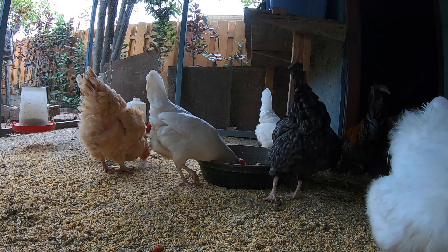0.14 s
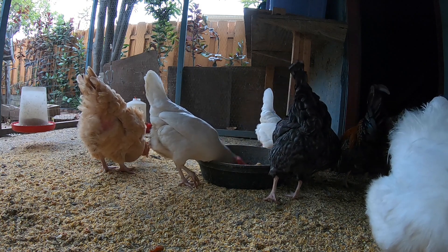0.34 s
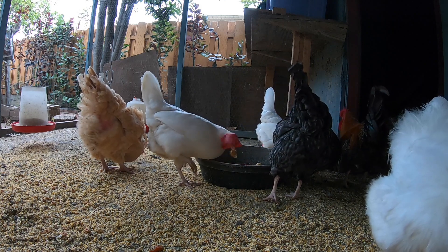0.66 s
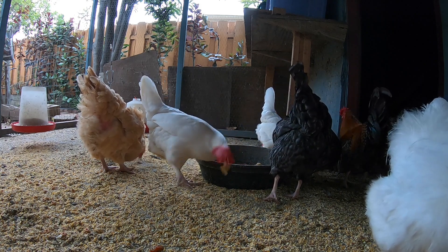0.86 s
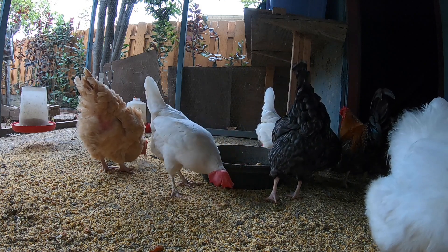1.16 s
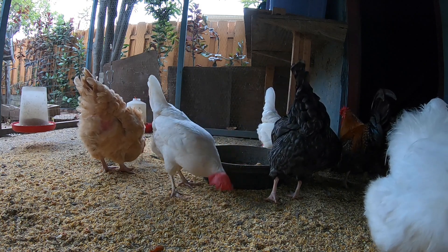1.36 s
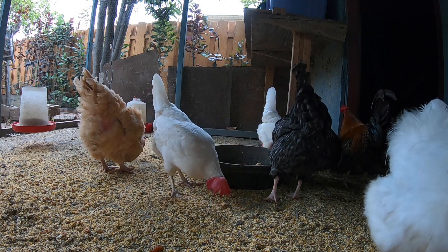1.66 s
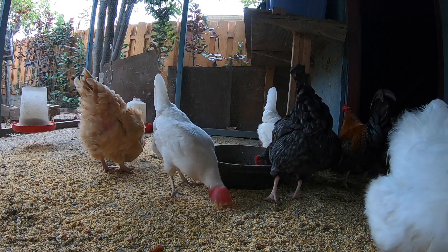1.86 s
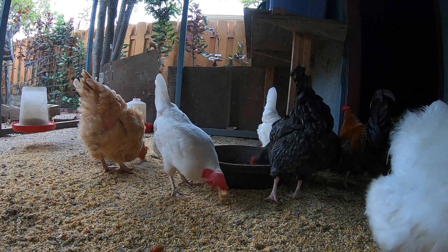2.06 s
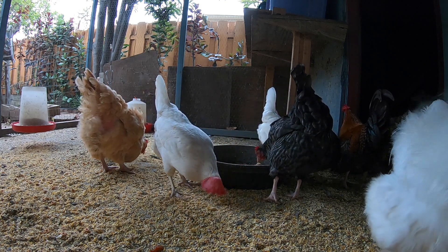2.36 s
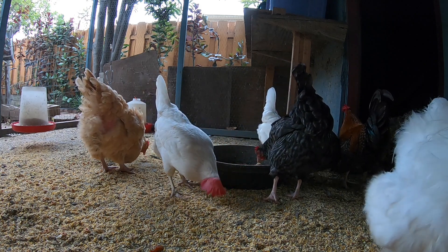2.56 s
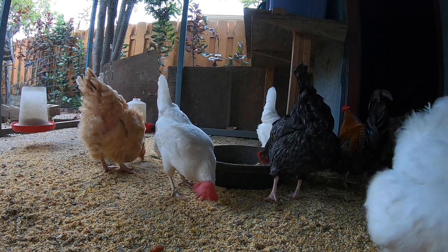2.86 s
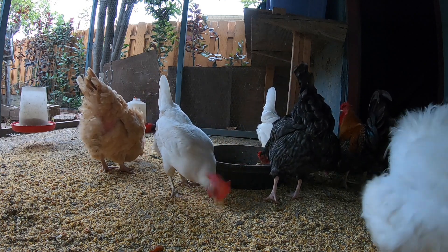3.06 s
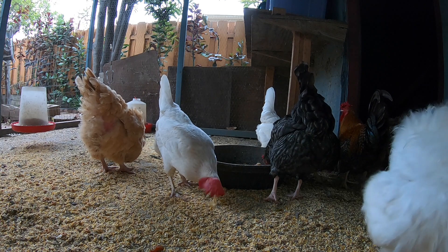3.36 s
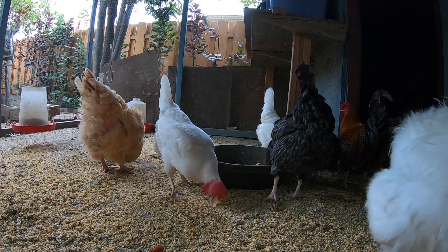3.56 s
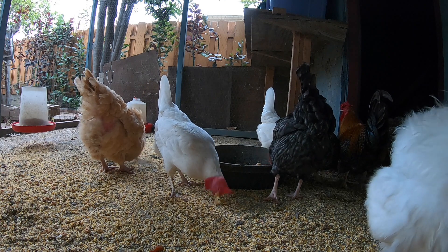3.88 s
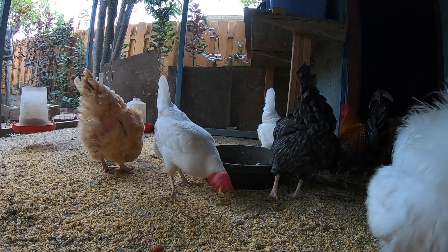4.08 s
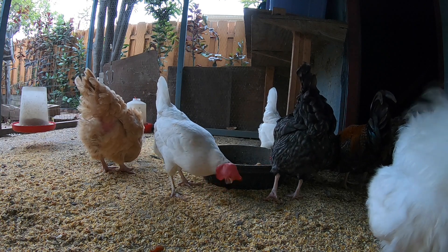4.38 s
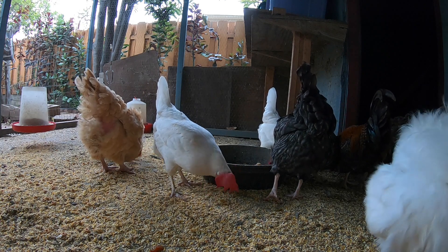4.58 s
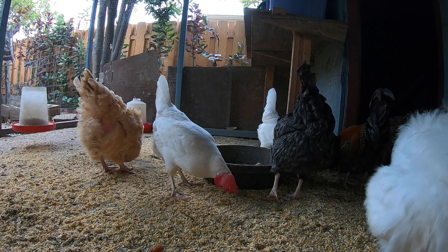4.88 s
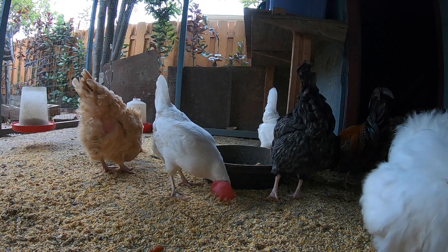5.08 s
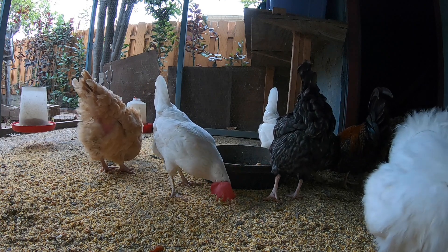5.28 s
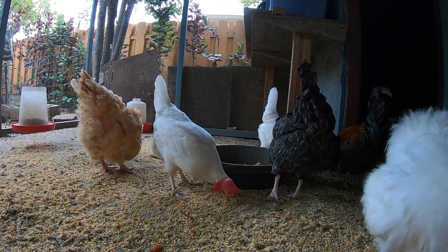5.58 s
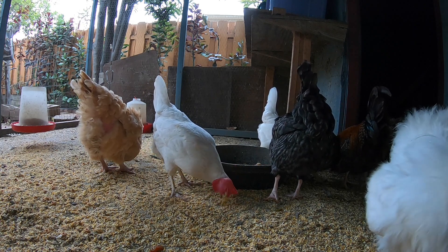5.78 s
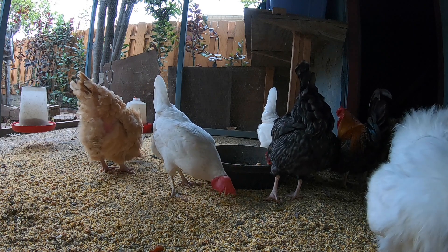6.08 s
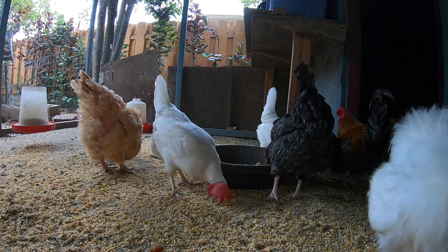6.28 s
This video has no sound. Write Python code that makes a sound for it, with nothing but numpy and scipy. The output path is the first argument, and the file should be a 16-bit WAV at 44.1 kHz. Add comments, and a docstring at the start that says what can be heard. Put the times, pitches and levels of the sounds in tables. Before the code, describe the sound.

In a backyard chicken run, a second hen briefly warbles softly before a nearby hen starts a loud, rasping growl. Eight shorter calls follow, increasingly shrill, starting hoarse and breaking into clear, nasal tones. Small dry beak ticks fall sparsely between and around calls, and later feathers stir low, soft puffs of air. A close stereo microphone places the hens somewhat left, with brief echoes from coop and fence over faint motor hum and still air.

```python
"""In a backyard run a second hen warbles softly, as falling notes with a few strong harmonics.
Then a hen cackles: one long rasping growl, and eight shorter, shriller calls that start hoarse and break
into a clear tone. Her voice is a buzzing membrane, shaped by a throat that changes posture.
Beaks tick on the feed now and then, as short bursts of noise; later feathers stir the air as low gusts.
Coop and fence echo the birds; a motor's hum and the noise of still air last throughout."""
import sys
import numpy as np
from scipy import signal
from scipy.fft import rfft, irfft
from scipy.io import wavfile
from scipy.ndimage import uniform_filter1d

SR = 44100
rng = np.random.default_rng(int(sys.argv[2]) if len(sys.argv) > 2 else 0)


def pcm_store(signal):
    """Save signal as 16-bit PCM."""
    levels = np.round(np.clip(np.atleast_2d(signal), -1, 1) * 32767)
    wavfile.write(sys.argv[1], SR, levels.astype(np.int16).T)


N = 284004
T = np.arange(N) / SR  # time of every sample, s

# the cackling hen's head: [t/s, beak opening 0-1, left minus right level/dB before each pitch takes its share]
HEAD = [(.3, 0.29, -5.5), (2.5, 0.2, -6), (3.6, 0.09, -4), (4.0, 0.28, -4), (4.12, 0.9, -5),
        (4.7, 0.84, -5.5), (5.2, 1, -5), (5.65, 0.44, -5), (6.1, 0.69, -3)]
# puffs of air stirred by feathers: [middle t/s, half length/s, level at the middle/dB]
RUFFLE = [(3.206, 0.045, -58), (3.5, 0.1, -60), (3.68, 0.11, -48.5), (3.83, 0.053, -53.5),
          (4.18, 0.09, -44), (4.33, 0.054, -57.5), (4.532, 0.11, -45), (4.72, 0.077, -40.5),
          (4.88, 0.089, -41), (5.17, 0.067, -42), (5.31, 0.053, -41.5), (5.42, .05, -45.5),
          (5.66, 0.1, -45), (6.08, 0.088, -46), (6.3, 0.092, -61)]
WANDERS_PER_S = 14  # how fast the hen's pitch, neck and loudness wander


def from_db(db):
    """Turn decibels into gain."""
    return 10 ** (np.asarray(db) / 20)


def rms_one(x):
    """Scale to an rms (average strength) of 1."""
    return x / np.sqrt(np.mean(x ** 2) + 1e-20)


def in_time(rows):
    """Draw straight lines between rows that start with a time; give each column at every sample."""
    s, *columns = np.transpose(rows)
    return [np.interp(T, s, column) for column in columns]


def butter(x, hz, kind, order=2):
    """Filter with a Butterworth filter that only looks back in time."""
    return signal.sosfilt(signal.butter(order, hz, kind, fs=SR, output="sos"), x)


def drift(rate):
    """Random wander of spread 1, up to about rate changes a second."""
    settled = butter(rng.standard_normal(N + SR), rate, "low")[SR:]  # drop the filter's first second
    return rms_one(settled)


def coloured_noise(points):
    """Noise of rms 1 whose spectrum follows the points [f/Hz, level per Hz/dB] and fades outside them."""
    hz, db = np.transpose(points)
    bins = np.maximum(np.fft.rfftfreq(N, 1 / SR), 1)
    gain = from_db(np.interp(np.log(bins), np.log(hz), db))
    gain = gain / (1 + (bins / hz[-1]) ** 8) * np.minimum(bins / hz[0], 1)
    return rms_one(irfft(rfft(rng.standard_normal(N)) * gain, N))


def swells(rows):
    """Strength of soft gestures that swell and die away evenly."""
    return sum(from_db(db) * np.exp(-((T - s) / half_s) ** 2) for s, half_s, db in rows)


def panned(x, pan_db):
    """Place a sound by its left minus right level."""
    return x * from_db(np.array([[.5], [-.5]]) * pan_db)


def hen(attack_s=0.019, release_s=0.0014, flutter_db=1.0, unsteady_db=1.07):
    """The cackle in stereo: a membrane buzzes, the throat colours it, and the turning head moves it sideways."""
    # calls, each starting as a growl: [start t/s, end t/s, growl level/dB, growl swell/dB per s,
    # growl rasp (0 = clear, about 1 = harsh), rasp added at the end]
    cackle = [ (0.279, 1.228, -44.5, 11.5, 0.97, 0.045), (1.612, 2.454, -37, 4.5, 1.04, 0.31),
              (2.701, 3.175, -30, -1, 0.93, 0.21), (3.396, 3.716, -27.5, -26, .9, 0.27),
              (3.926, 4.219, -31, 14, 0.9, 0.39), (4.496, 4.957, -33.5, 23.5, 0.78, 0.28),
              (5.076, 5.254, -30, -0.5, 0.78, 0.75), (5.525, 5.866, -32, 0.5, .85, 0.37),
              (5.976, 6.182, -31.5, -5, 0.75, 0.54), ]
    # pitch of each call, creeping up in the growl, leaping at the break, arching and dropping: [t/s, f/Hz]
    contours = [
        [(.282, 259.6), (.335, 258), (.385, 283), (.42, 273.1), (.6, 286), (.7, 309.2), (.78, 295), (.9, 310.6),
         (1.07, 308.4), (1.15, 294), (1.223, 286.4)],
        [(1.614, 254.6), (1.76, 286.3), (1.94, 299.5), (2.06, 326.6), (2.12, 354.4), (2.2, 359.4),
         (2.26, 365.3), (2.33, 396.2), (2.41, 380.6), (2.453, 361)],
        [(2.701, 253.2), (2.8, 282.5), (2.908, 284.1), (2.916, 350), (2.96, 354.5), (3.01, 372), (3.09, 388),
         (3.15, 383.2), (3.174, 366)],
        [(3.393, 246.8), (3.43, 283.3), (3.468, 295.2), (3.478, 336.3), (3.51, 353.4), (3.57, 366.4),
         (3.6, 374.2), (3.675, 397.4), (3.7, 382.7), (3.714, 363)],
        [(3.927, 313.2), (3.99, 337.5), (4.04, 382.5), (4.08, 384.9), (4.1, 422.4), (4.135, 428.7),
         (4.19, 413.3), (4.217, 380)],
        [(4.499, 311.4), (4.55, 389), (4.62, 410), (4.68, 419.8), (4.72, 412.2), (4.82, 425), (4.88, 417),
         (4.935, 412.3), (4.956, 369.7)],
        [(5.078, 318.7), (5.1, 387.2), (5.14, 407.5), (5.17, 418.6), (5.2, 417.4), (5.23, 420), (5.252, 349.6)],
        [(5.527, 348), (5.57, 394.2), (5.6, 414.1), (5.67, 421.6), (5.73, 441.2), (5.81, 455.3), (5.845, 440.2),
         (5.868, 392.2)],
        [(5.978, 344), (6, 409.8), (6.02, 441), (6.07, 438.9), (6.12, 434.3), (6.15, 429.7), (6.185, 340)],
    ]
    # three high throat resonances that glide as the neck stretches and shortens:
    # [t/s, middle f/Hz, upper f/Hz, top f/Hz, boost of the upper/dB, boost of the top/dB]
    neck = [ (.4, 3250, 5500, 7060, -18, -3), (.56, 3300, 5530, 7300, 0, 1),
            (.7, 3451, 5850, 7100, -4, 10.5), (.84, 3395, 6260, 7400, -10, 9),
            (.93, 3588, 6600, 8300, 0, 8), (1.06, 3697, 6550, 8300, -1, -3),
            (1.22, 3872, 6331, 7950, 1, -2.5), (1.62, 3780, 6400, 7900, -0.5, -6),
            (1.92, 3900, 6557, 8100, 2, 3), (2.17, 3730, 6520, 7900, 5.5, 8),
            (2.3, 3580, 6283, 7800, 0, 4.5), (2.45, 3430, 6150, 7600, -3, 3), (2.7, 3666, 6150, 7540, 1, 5),
            (2.9, 3695, 6185, 7916, 0, 1.5), (3.0, 3550, 6200, 7590, 1, -3.5),
            (3.17, 3540, 6140, 7600, 0.5, 3), (3.4, 3664, 6180, 7677, 2, 1),
            (3.71, 3650, 6253, 7790, -0.5, -3.5), (3.93, 3650, 6193, 7955, 7, 12.5),
            (4.08, 3640, 6150, 7648, 0, -5), (4.12, 3700, 5860, 7100, 7.5, 3),
            (4.21, 3550, 5690, 6794, -5, -10), (4.5, 3515, 5894, 7310, 2.5, 4),
            (4.68, 3450, 5790, 7255, -1, -0.5), (4.8, 3428, 5580, 6697, 1.5, -1.5),
            (4.95, 3400, 5498, 6800, 0.5, -5), (5.08, 3137, 5404, 6590, -14, -7),
            (5.13, 3190, 5450, 6750, -2, -2), (5.17, 3556, 5650, 6830, 8, 7.5),
            (5.25, 3550, 5717, 6910, -2, -1.5), (5.53, 3620, 5740, 7300, -6, 3.5),
            (5.62, 3660, 5738, 7250, -10, -8.5), (5.75, 3730, 6010, 7506, -3.5, 2.5),
            (5.86, 3720, 6090, 7660, -3.5, -5), (5.98, 3915, 6200, 7933, -0.5, 6),
            (6.08, 3750, 6095, 7550, 0, 6), (6.18, 3480, 5800, 7450, -1.5, 0), ]
    # how much of the head's sideways level each frequency shows: [f/Hz, share]
    shadow = [(400, 0.2), (520, 0.7), (700, 2.5), (1300, 0.5), (2300, 0.87), (4500, 0.02), (8000, 0)]
    tone_wander, growl_wander, neck_wander = 0.003, .036, 0.0054  # shares of the pitch or frequency
    # the growl's low resonances rise with its pitch and shake
    ring_rest_hz, ring_limit, ring_follows, ring_shake = 286, 1.14, .55, .03
    window = dict(nperseg=512, noverlap=384)

    gate = sum(np.clip((T - start) / attack_s + 0.38, 0, 1) * np.clip((end - T) / release_s + 1, 0, 1)
               for start, end, *_ in cackle)
    calls = np.vstack([call(contour, *row) for contour, row in zip(contours, cackle)])
    pitch, rasp, growl, *levels_db = in_time(calls)
    opening, pan_db = in_time(HEAD)
    rasp = np.clip(rasp, 0, 1.2)
    growl, opening = np.clip(growl, 0, 1), np.clip(opening, 0, 1)
    pitch = pitch * (1 + (tone_wander + growl_wander * rasp ** 2) * drift(WANDERS_PER_S))

    # cut the buzz into short overlapping frames, so its spectrum can be shaped over time
    hz, s, frames = signal.stft(syrinx(pitch, rasp, opening), SR, **window)
    hz = np.maximum(hz, 1)[:, None]
    curves = (*levels_db, growl, opening, pan_db, pitch, drift(WANDERS_PER_S))
    *levels_db, growl, wide, pan, note, bob = (np.interp(s, T, curve) for curve in curves)
    *neck_hz, upper_db, top_db = (np.interp(s, T, curve) for curve in in_time(neck))
    neck_hz = np.array(neck_hz) * (1 + neck_wander * bob)
    ring = np.minimum(note / ring_rest_hz, ring_limit) ** ring_follows
    ring = ring * (1 + ring_shake * np.interp(s, T, drift(45)))

    frames = frames * throat(hz, growl, wide, neck_hz, upper_db, top_db, ring)
    frames = registers(frames * near_echo(hz, s), hz, note, levels_db)
    pan = pan * np.interp(hz, *np.transpose(shadow))
    voice = signal.istft(frames * from_db([pan / 2, -pan / 2]), SR, **window)[1][:, :N]
    return voice * gate * from_db(flutter_db * rasp * drift(82) + unsteady_db * drift(WANDERS_PER_S))


def call(contour, start, end, growl_db, swell_db, growl_rasp, end_rasp, growl_posture=0.79, end_posture=0.75):
    """One call: effort drives a growl, breaks turn it into tones, and it ends hoarse, fading if the beak is open.

    Rows: (s, pitch Hz, rasp, share of the growl's throat, fundamental dB, chest dB, mouth dB, treble dB)."""
    # breaks into a tone or a new colour, which lasts until the next break or the call's end:
    # [t/s, time the break takes/s, chest level halfway through the tone's swell/dB, rasp 0-1,
    # share of the growl's throat 0-1, fundamental re chest/dB,
    # mouth band re chest/dB, treble re chest/dB (both before their swells)]
    breaks = [ (2.132, 0.068, -40, 0.17, 0.01, -8.5, -5.5, -8),
              (2.278, 0.05, -38.5, 0.04, 0.17, -12.5, -6, -6),
              (2.914, 0.0065, -35, 0.1, 0.01, -11, -6.5, -10.5),
              (2.98, 0.024, -39, 0.07, 0.12, -10, -6, -5.5),
              (3.475, 0.0055, -37.5, 0.34, 0.6, -7, -1, -10.5), (3.505, 0.026, -38, 0.12, 0, -10, -5.5, -6),
              (4.012, 0.024, -39, 0.05, 0.36, -5.5, -4, -6.5),
              (4.099, 0.03, -35, 0.08, 0.03, -4, -1.5, -4.5),
              (4.65, 0.023, -35.5, 0.15, 0.34, -4.5, 1, -4.5),
              (4.769, 0.029, -30.5, 0.26, 0.02, -7.5, -6, -9), (4.9, 0.046, -34.5, 0.32, 0.03, 0, -1, -3.5),
              (5.097, 0.0068, -36.5, 0, 0.79, -2, 6, -8), (5.12, 0.015, -33.5, 0.01, 0.84, -2, -0.5, -10),
              (5.147, .015, -33.5, 0.1, 0, -4, -2, -6), (5.58, 0.041, -38, 0.16, 0.06, 1.5, -4, -2),
              (5.752, .025, -35.5, 0.63, 0.11, -3.5, -2, -3), (5.803, .025, -34, 0.15, 0, -1.5, -4.5, -3),
              (6.0, 0.0084, -35, 0.04, .5, -1, -4, -7), (6.035, .02, -39, .08, 0, -1, 1.5, -2),
              (6.084, 0.058, -34, 0.19, 0.27, -1, -2.5, -6), ]
    # with the mouth band at growl_ref_db, the growl's chest and treble have these levels, before the beak's effect
    growl_ref_db, growl_chest_db, growl_treble_db = -27.5, -37, -37.5
    chest_follows, treble_follows = 0.28, 2.12  # dB per dB of effort
    rasp_limit, rasp_per_db = 1.6, .045  # most rasp at growl_ref_db, and its change per dB of effort
    scoop_s, scoop_db = 0.0516, -5.5  # the growl starts a little softer
    open_chest_db, open_fundamental_db = -3, 20.5  # change with a fully open beak
    growl_fundamental_db = -15.5  # re chest, beak closed
    band_swells_db = [2, 0, -1.5]  # change of chest, mouth and treble along a tone
    sag_s, sag_db = 0.03, -10.5  # as the call runs out

    s = np.linspace(start, end, 300)
    opening = np.interp(s, *np.transpose(HEAD)[:2])
    effort = growl_db + scoop_db * np.exp(-(s - start) / scoop_s) + swell_db * (s - start)
    extra_db = effort - growl_ref_db
    chest = growl_chest_db + chest_follows * extra_db + open_chest_db * opening
    voice = np.array([
        np.minimum(growl_rasp, rasp_limit + rasp_per_db * extra_db),
        np.full_like(s, growl_posture),
        chest + growl_fundamental_db + open_fundamental_db * opening,
        chest,
        effort,
        growl_treble_db + treble_follows * extra_db])
    for at, break_s, db, rasp, posture, fundamental_db, mouth_db, treble_db in breaks:
        if start < at < end:
            done = np.clip((s - at) / (end - at), 0, 1)
            chest, mouth, treble = db + np.outer(band_swells_db, done - .5)
            tone = np.array([np.full_like(s, rasp), np.full_like(s, posture), chest + fundamental_db,
                             chest, mouth + mouth_db, treble + treble_db])
            voice = voice + (tone - voice) * np.clip((s - at) / break_s + .5, 0, 1)
    rasp, posture, *levels_db = voice
    sag = np.exp(-((end - s) / sag_s) ** 2)
    fade_db = sag_db * sag ** 2 * opening
    rasp = rasp + end_rasp * sag
    posture = posture + end_posture * end_rasp * sag
    return np.transpose([s, np.interp(s, *np.transpose(contour)), rasp, posture, *(levels_db + fade_db)])


def syrinx(pitch, rasp, opening, jitter=0.062, waver=0.00291, split=0.28, smear=.21, top_hiss=0.033,
           shimmer_db=3.0):
    """A buzzing membrane; rasp scatters the timing and strength of its cycles, makes it slap and adds rushing air."""
    # slaps come at uneven moments and die down in between: mean rate, spread of the rate, fall at rasp 1
    slaps_per_s, slap_spread, slap_fall_db = 75, .4, 6.5
    wobble = jitter * rasp ** 1.293 * drift(216.4) + waver * drift(59.0)
    phase = 2 * np.pi * np.cumsum(pitch * (1 + wobble)) / SR
    # pushed hard, the membrane repeats only every second or fourth cycle
    uneven = np.sin(phase / 2) + .6 * np.sin(phase / 4)
    phase = phase + split * opening * np.sqrt(rasp) * uneven
    # each harmonic lags differently, which spreads the pulse over its cycle
    buzz = rms_one(sum(np.cos(k * phase - smear * np.pi * k * k) for k in np.arange(1, 35)))
    puffs = rms_one(rng.standard_normal(N) * (1 + .6 * np.cos(phase)))
    air = (.06 + .75 * rasp * (1 - .35 * opening)) * puffs
    air = air + top_hiss * butter(puffs, 5500, "high", order=3)
    since_slap = np.cumsum(slaps_per_s * np.exp(slap_spread * drift(slaps_per_s))) / SR % 1
    slap_db = slap_fall_db * rasp ** 2 * (1.0 - since_slap)
    return (buzz + air) * from_db(shimmer_db * rasp * drift(180) + slap_db)


def throat(hz, growl, opening, neck_hz, upper_db, top_db, ring, boost_width_hz=900):
    """The throat glides between three postures; stretching the neck shifts its higher resonances."""
    # throat resonances when growling, before the neck shifts them: [f/Hz, width/Hz, level/dB]
    growl_modes = [(293, 270, -19.5), (609, 270, -13), (1134, 160, 6.5), (1490, 180, -14),
                   (2120, 810, -24.5), (2885, 520, -24.5), (3513, 550, -12.5), (4550, 1400, -23.5),
                   (6170, 390, -18), (7430, 1600, -31.5), (8940, 600, -42.5)]
    # throat resonances of the clear tone, the same columns: [f/Hz, width/Hz, level/dB];
    # the last row is no throat resonance but a faint narrow band of treble near 10 kHz
    clear_bands = [(373, 500, -11), (733, 58, 1.5), (1160, 300, -1), (1472, 160, 7.5), (1880, 270, 0),
                   (2203, 160, 3), (3600, 790, 4.5), (4580, 310, -7), (6100, 325, 6.5), (7550, 680, -5),
                   (10200, 220, -38)]
    # throat resonances when shrieking, the same columns: [f/Hz, width/Hz, level/dB]
    shriek_modes = [(367, 360, -10.5), (842, 63.8, -4.5), (1190, 430, -5.5), (1890, 430, -15),
                    (2190, 260, -24), (2972, 230, -9.5), (3645, 1230, -10), (4300, 600, -21.5),
                    (6230, 870, -19), (7420, 770, -20), (9250, 1200, -30)]
    # dips of the windpipe, the same in every posture: [f/Hz, width/Hz, depth/dB]
    notches = [(2644, 370, -6), (4920, 140, -5.5)]
    # the three high resonances with the neck at rest: [middle f/Hz, upper f/Hz, top f/Hz]
    neck_rest_hz = [3550, 6150, 7600]

    notches_db = sum(db * np.exp(-(2 * (hz - centre) / width) ** 2) for centre, width, db in notches)
    # stretch the frequency scale so that the resting resonances land where the neck puts them
    rest_scale = [0, 2300, *neck_rest_hz, 9600, SR]
    hz = np.transpose([np.interp(hz[:, 0], [0, 2300, *now, 9600, SR], rest_scale)
                       for now in np.transpose(neck_hz)])
    boost_db = sum(db * np.exp(-(2 * (hz - centre) / boost_width_hz) ** 2)
                   for centre, db in zip(neck_rest_hz[1:], (upper_db, top_db)))
    tone = (1 - opening) * resonances(clear_bands, hz) + opening * resonances(shriek_modes, hz)
    # mostly the growl's resonances below 2 kHz follow ring
    growl_hz = hz / ring ** (1 / (1 + (hz / 2000) ** 6))
    posture = resonances(growl_modes, growl_hz) ** growl * tone ** (1 - growl)
    return from_db(notches_db + boost_db) * posture


def resonances(modes, hz, leak_db=-55, top_hz=12500):
    """Gain of steep-sided peaks side by side, with a little leaking between them."""
    power = sum(from_db(db) ** 2 / (1 + (2 * (hz - centre) / width) ** 2) ** 2
                for centre, width, db in modes)
    gain = np.sqrt(power + from_db(leak_db) ** 2)
    return gain / (1 + (255 / hz) ** 8) / (1 + (hz / top_hz) ** 4)


def near_echo(hz, s, delay_s=.0011, wander_s=.00008, depth_db=3.0):
    """A surface near the bobbing head reflects the voice, so its higher partials swell and fade in turn."""
    delay = delay_s + wander_s * np.interp(s, T, drift(6.45))
    return from_db(depth_db * np.cos(2 * np.pi * hz * delay) / (1 + (2000 / hz) ** 6))


def registers(frames, hz, pitch, levels_db):
    """Bring the voice's fundamental, chest band (second harmonic), mouth band and treble to their levels."""
    edges_hz = (1.45 * pitch, 2.55 * pitch, 2700)
    first, second, below_treble = (1 / (1 + (hz / edge) ** 24) for edge in edges_hz)
    bands = (first, second - first, below_treble - second, 1 - below_treble)
    out = 0
    for band, db in zip(bands, levels_db):
        power = uniform_filter1d(np.sum(abs(frames * band) ** 2, axis=0), size=11)  # smoothed over 11 frames
        out = out + frames * band * from_db(db) / np.sqrt(power + 1e-18)
    return out


def second_hen(jitter=0.028, pan_db=-5.5, hiss_db=-18, air_db=-37, slur_s=0.0087):
    """Soft, husky falling notes, slurred together: two strong harmonics under faint airy overtones."""
    # notes that leap up, hold and fall back, before they are slurred:
    # [start t/s, length/s, top f/Hz, hold as a power of time, level of the tone/dB]
    notes = [(0, 0.027, 531, 1.03, -41.5), (0.031, 0.075, 682, 1.4, -42), (0.112, 0.093, 597.4, 3.1, -41.5),
             (0.212, 0.079, 635, 0.77, -41.5)]
    # the second hen's throat resonances: [f/Hz, width/Hz, level/dB]
    throat_modes = [(563, 250, 2), (1024, 230, 0), (1900, 330, -19.5), (3200, 450, -40), (4400, 700, -52),
                    (7200, 1800, -50)]
    low_hz = 471  # every note falls towards this pitch
    pitch, gain = np.full(N, float(low_hz)), np.zeros(N)
    for start, length, top_hz, hold, db in notes:
        note = (T >= start) & (T < start + length)
        fall = .5 + .5 * np.cos(np.pi * ((T[note] - start) / length) ** hold)
        pitch[note] = low_hz + (top_hz - low_hz) * fall
        gain[note] = from_db(db)
    pitch, gain = uniform_filter1d([pitch, gain], int(slur_s * SR))
    phase = 2 * np.pi * np.cumsum(pitch * (1 + jitter * drift(190))) / SR
    tone = sum(resonances(throat_modes, k * pitch) * np.sin(k * phase) for k in range(1, 15))
    husk = from_db(hiss_db) * rms_one(butter(rng.standard_normal(N), [500, 1250], "band", order=3))
    air = from_db(air_db) * rms_one(butter(rng.standard_normal(N), [1500, 3500], "band", order=1))
    return panned((rms_one(tone) + husk + air) * gain, pan_db)


def ticks(rise_s=0.0015, t60=0.027, level_db=-2):
    """Each tick of a beak is a short dry crack with one ring, both noise bands that die by 60 dB in t60 seconds."""
    # ticks: [start t/s, ring level before level_db and the decay/dB, ring f/Hz, ring width/octaves,
    # crack re ring level/dB]
    beak_ticks = [(0.286, -60.5, 4950, 1, 16), (0.3, -49.5, 6500, .6, -9), (1.083, -56, 5500, 1.2, -12),
                  (1.112, -48, 4470, 1.3, -4), (1.123, -44, 5570, 0.99, 0), (1.568, -54, 706, 0.56, -29),
                  (1.592, -64, 4392, .2, -25), (2.67, -41.5, 630, 1.34, -15), (3.374, -39, 999, 1.6, -18),
                  (3.384, -32.5, 1770, 0.29, -32), (3.911, -36.5, 820, 1.646, -27),
                  (5.499, -46.5, 622, 1.4, -26)]
    out = np.zeros(N)
    for s, db, hz, octaves, crack_db in beak_ticks:
        noise = rng.standard_normal(SR // 8)
        ring = rms_one(butter(noise, [hz / 2 ** (octaves / 2), hz * 2 ** (octaves / 2)], "band"))
        crack = from_db(crack_db) * rms_one(butter(noise, [2500, 7500], "band", order=4))
        t = T[:len(noise)]
        envelope = np.minimum(t / rise_s, 1) * from_db(db + level_db - 60 * t / t60)
        at = int(s * SR)
        out[at:at + len(noise)] += (ring + crack) * envelope
    return out


def feathers(rustle_db=-30, grain_db=2.0):
    """Feathers that stir the air also rustle faintly, and feet scuff the feed: swelling bands of noise."""
    # scuffs of the feet: [middle t/s, half length/s, level at the middle/dB]
    scuffs = [(3.85, 0.1, -60.5)]
    # spectrum of a scuff: [f/Hz, relative level per Hz/dB]
    scuff_colour = [(600, 1), (1500, -2), (4000, -12), (7000, -17), (9700, -8), (11500, -22)]
    rustle = from_db(rustle_db) * rms_one(butter(rng.standard_normal((2, N)), [1500, 11000], "band"))
    noise = np.array([coloured_noise(scuff_colour) for _ in range(2)])
    scuff = rms_one(noise * from_db(grain_db * drift(150)))  # grainy loudness
    return rustle * swells(RUFFLE) + scuff * swells(scuffs)


def yard(x, t60=0.24, tail_db=5.0, build_s=0.002, lowest_hz=1200):
    """A few sharp echoes, then a short scattered tail that holds little bass and dies by 60 dB in t60 seconds."""
    # first echoes off ground, coop and fence, a list for left and one for right: [delay/s, gain]
    first_echoes = [
        [(.0029, -0.087), (.0083, 0.13), (.0171, 0.19)],
        [(.0026, 0.1), (.0112, 0.091), (.0233, .1)],
    ]
    t, out = T[:SR // 2], []
    for channel, echoes in zip(x, first_echoes):
        tail = butter(rng.standard_normal(len(t)), lowest_hz, "high", order=2)
        tail = tail * from_db(-60 * t / t60) * np.minimum(t / build_s, 1) ** 2
        response = from_db(tail_db) * tail / np.linalg.norm(tail)
        response[0] += 1  # the direct sound
        for delay, gain in echoes:
            response[int(delay * SR)] += gain
        out.append(signal.fftconvolve(channel, response)[:N])
    return np.array(out)


def background(hum_waver_db=2.5, air_side=0.66, ruffle_side=0.12, lump_db=0.2):
    """A distant motor's hum is a wavering sine; still air and the low gusts from feathers are coloured noise."""
    # spectrum of the feathers' gusts: [f/Hz, relative level per Hz/dB]
    ruffle_colour = [(13, -72), (22, -17), (42, -8.5), (57, 6), (85, -9), (113, -14.5), (172, -14.5),
                     (237, -19), (260, -15), (340, -19), (570, -120)]
    # spectrum of the yard's still air: [f/Hz, relative level per Hz/dB]
    yard_air = [(25, -2), (60, -3), (110, -15.5), (180, 2), (260, -11), (500, -22.5), (900, -15.5),
                (2000, -31), (4000, -31), (8000, -38.5), (11000, -57.5), (15000, -55)]
    hum_hz, hum_db = 172.6, -58.5  # middle of the wavering pitch and level
    air_gain = from_db(-65.5)
    hum = np.sqrt(2) * np.sin(2 * np.pi * np.cumsum(hum_hz + 1.0 * drift(11)) / SR)
    hum = hum * from_db(hum_db + hum_waver_db * drift(28))
    ruffle = swells(RUFFLE) * from_db(lump_db * drift(2.0))
    # mid is shared by both ears; side is added left and taken away right, which widens the sound
    mid = air_gain * coloured_noise(yard_air) + ruffle * coloured_noise(ruffle_colour)
    side = air_side * air_gain * coloured_noise(yard_air)
    side = side + ruffle_side * ruffle * coloured_noise(ruffle_colour)
    return np.array([hum + mid + side, hum + mid - side])


def scene():
    """The birds echo in their yard, over feathers, scuffing feet and the background."""
    return yard(hen() + second_hen() + ticks()) + feathers() + background()


def record(dry, cutoff_hz=15200):
    """Cut the top steeply."""
    return signal.sosfilt(signal.ellip(10, .1, 90, cutoff_hz, fs=SR, output="sos"), dry)


dry = scene()
out = record(dry)
pcm_store(out)
```